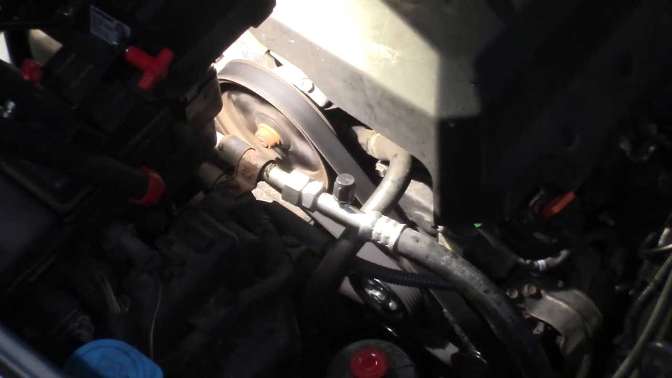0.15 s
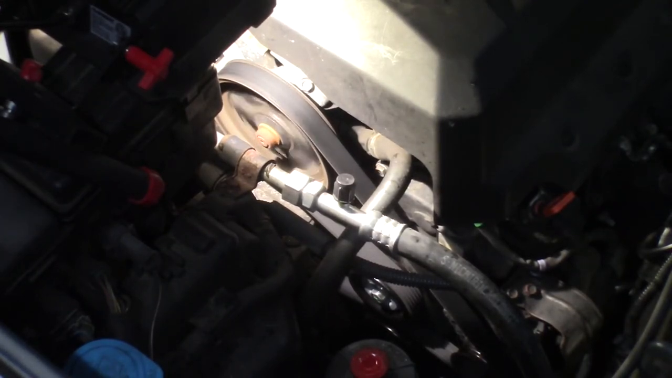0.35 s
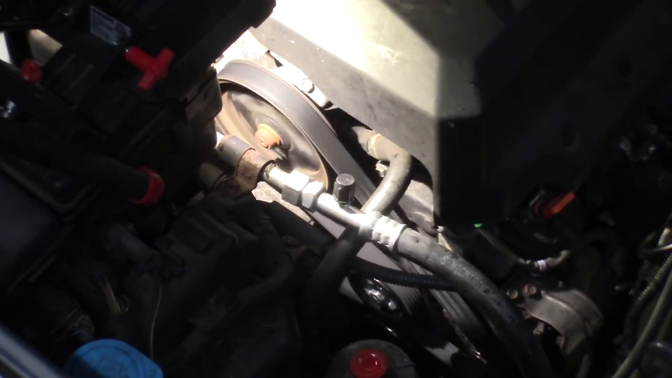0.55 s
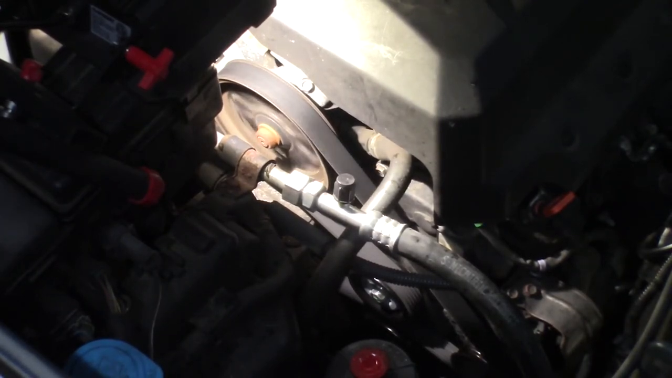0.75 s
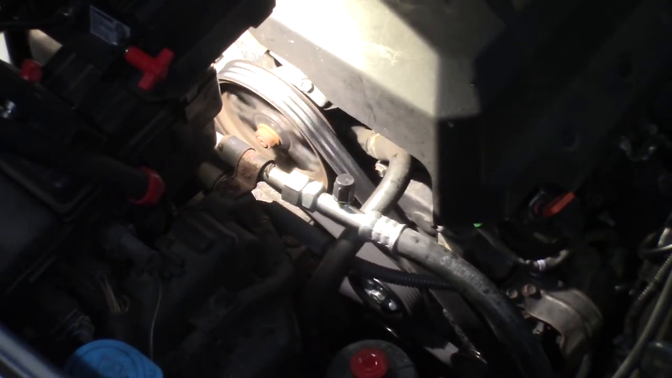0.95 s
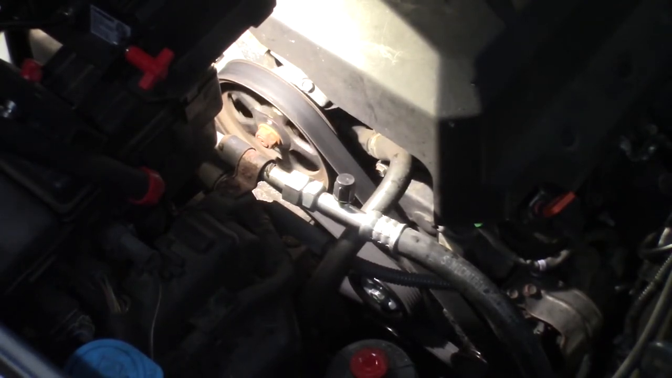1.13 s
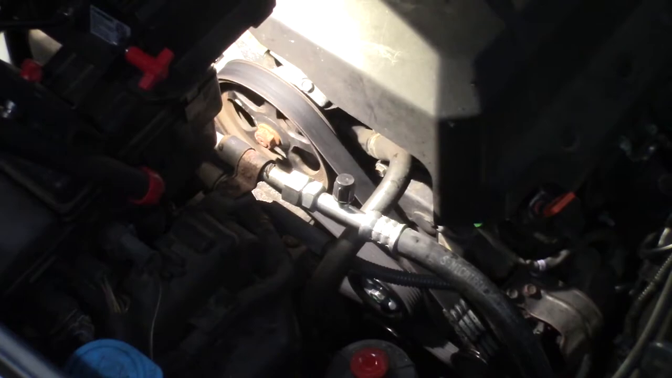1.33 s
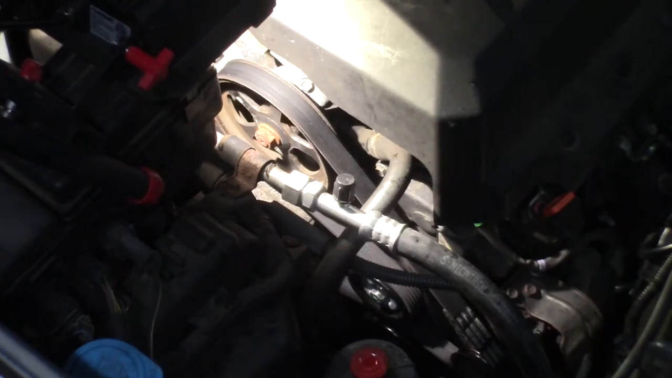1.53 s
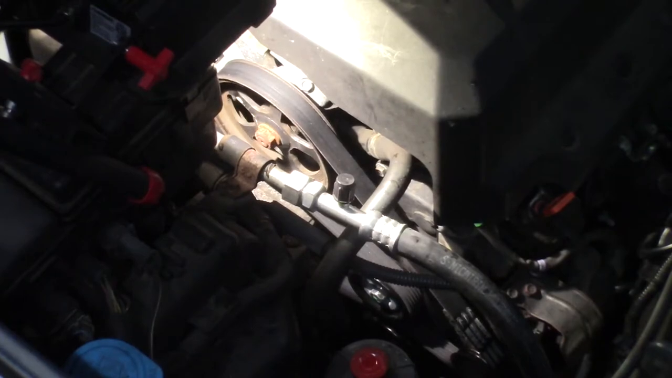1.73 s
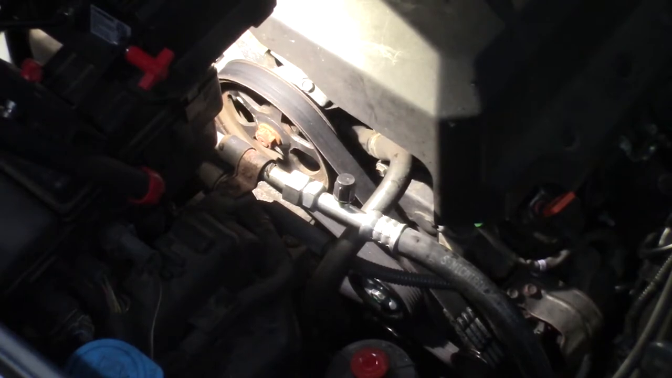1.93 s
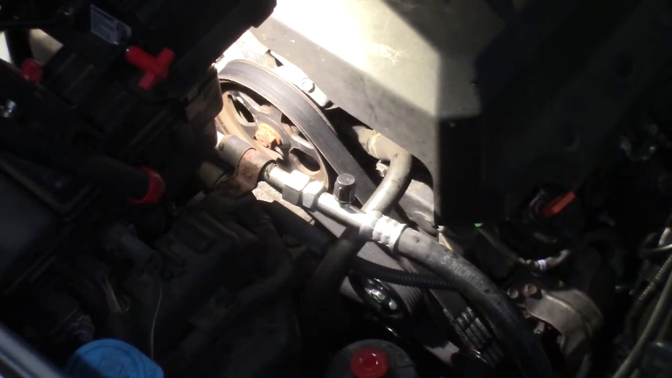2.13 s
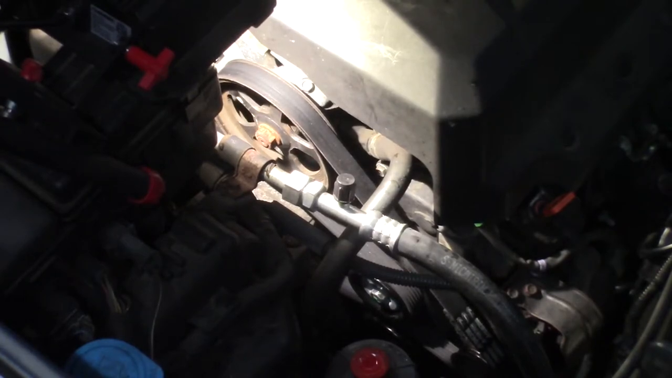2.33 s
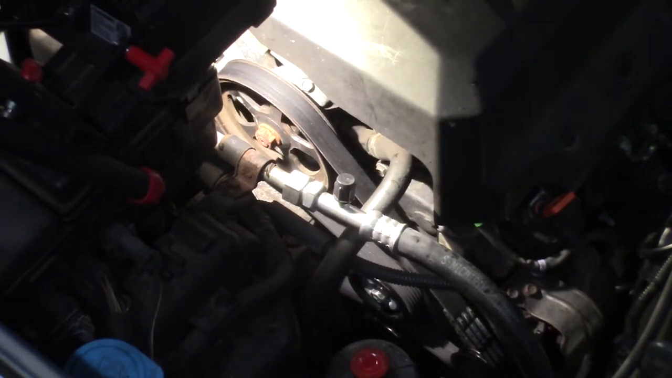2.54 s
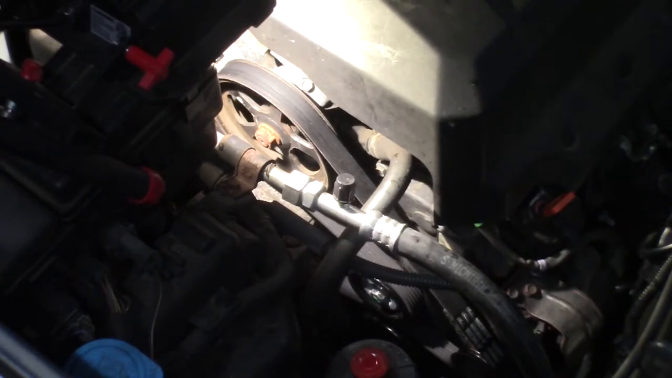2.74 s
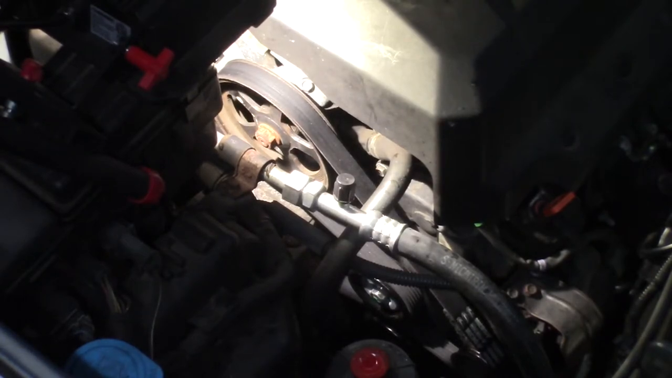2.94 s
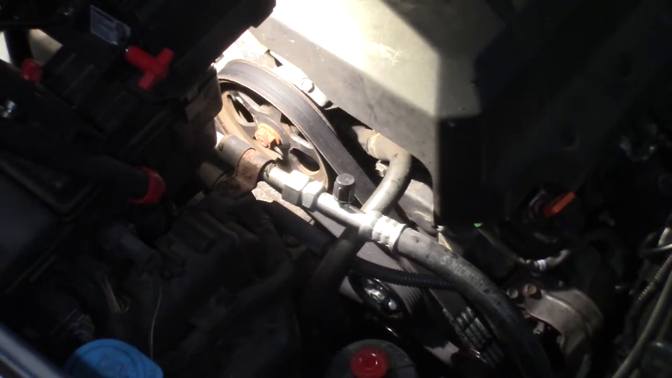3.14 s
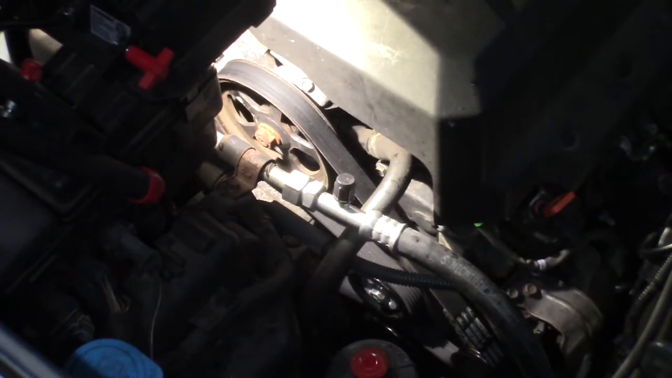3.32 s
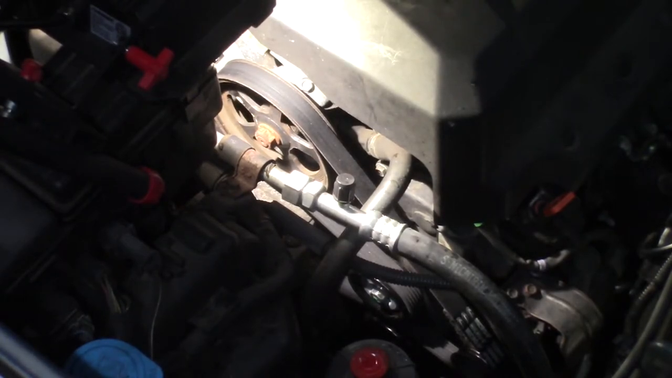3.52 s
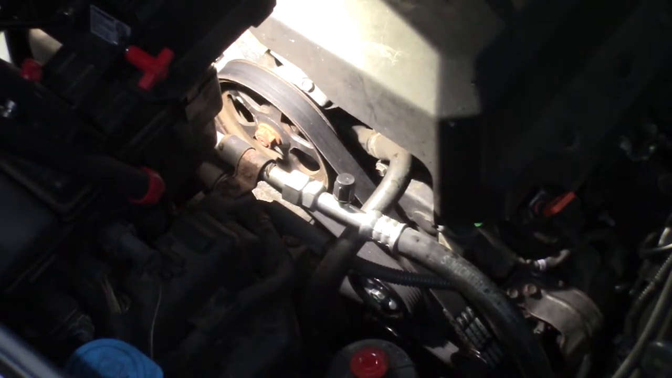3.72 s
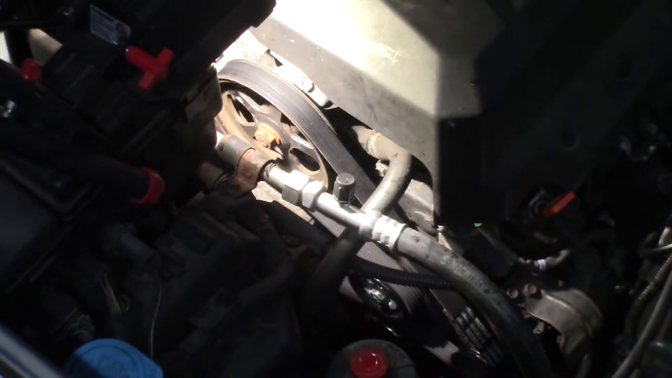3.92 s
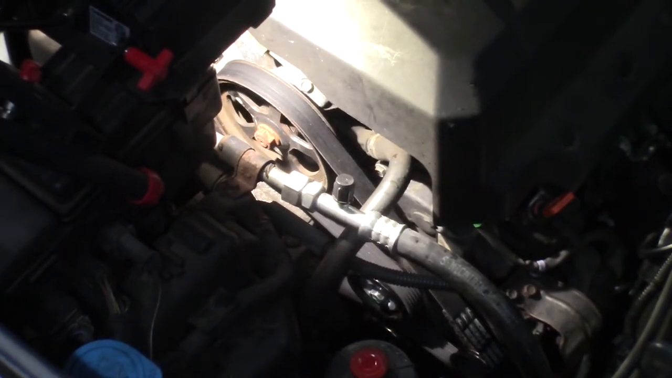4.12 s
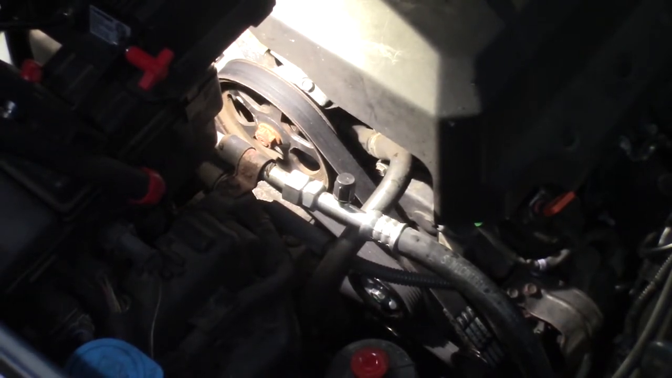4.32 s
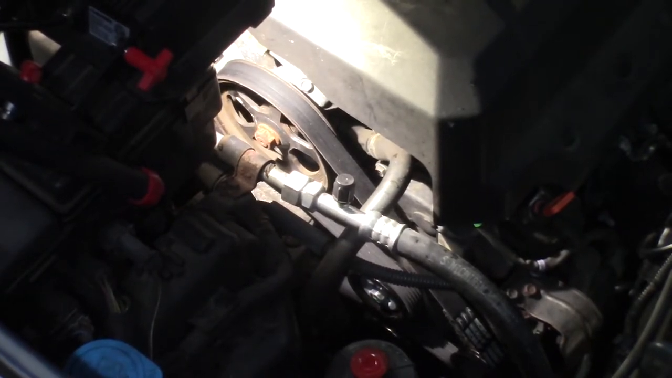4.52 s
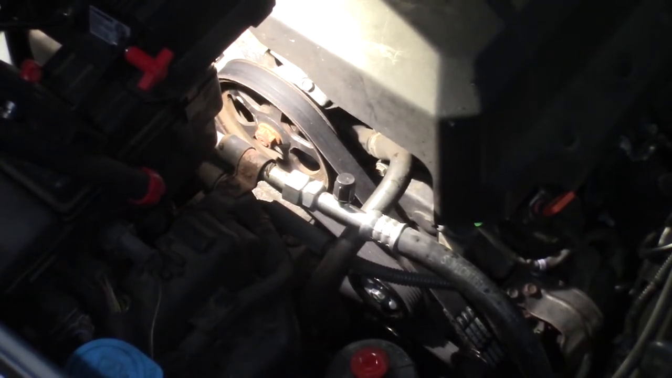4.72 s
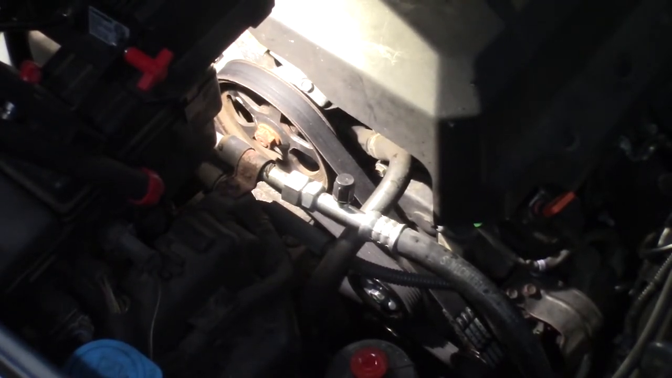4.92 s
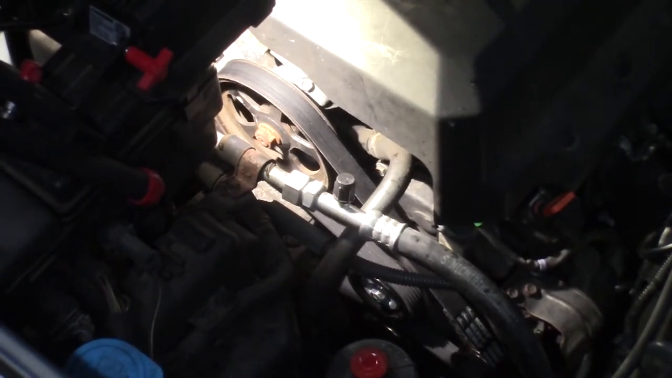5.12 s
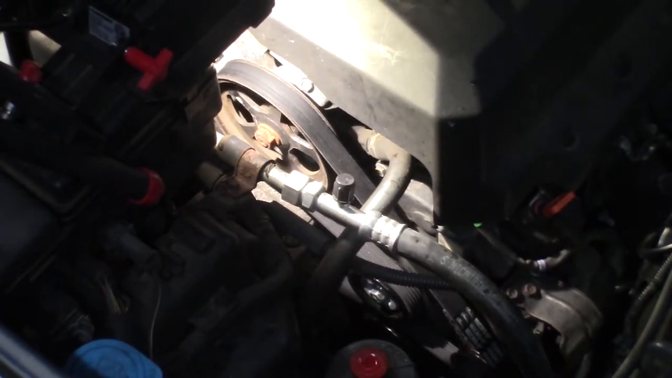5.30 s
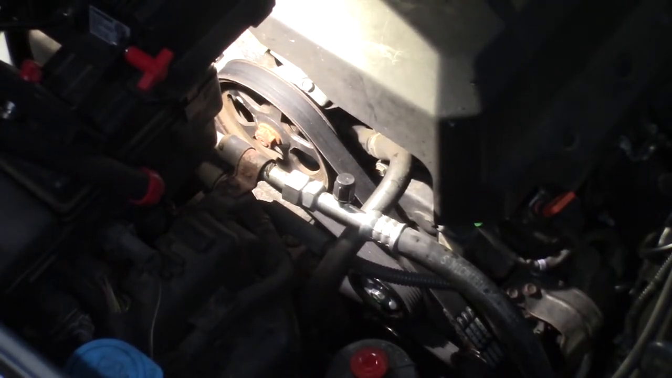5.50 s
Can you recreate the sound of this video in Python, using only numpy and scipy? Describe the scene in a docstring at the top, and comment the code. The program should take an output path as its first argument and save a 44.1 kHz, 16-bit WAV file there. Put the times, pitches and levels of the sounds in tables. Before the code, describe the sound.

Stereo microphone in an engine bay, open air: a rough, throbbing idle with hissing belt slows and dies, ending in a thud, sharp clack and brief groaning squeak. Then near silence, with a faint hum and high whine, cloth rustles and padded knocks on the body. The whine ends just before a heavy door slam with ringing panels; scuffing steps finish.

```python
"""A car engine idles under an open bonnet outdoors: firings shake the block, valves tick, the belt hisses.
Switched off, it runs down to a thud and a clack; then the belt slips with a groan.
An electric hum and a throttle actuator's whine carry on, made of steady sines.
The driver climbs out with rustles and scuffs of shaped noise and soft knocks on the car body, slams
the door, whose panels ring, and walks on to a hollow knock of a foot; walls answer clacks and knocks."""
import sys
import numpy as np
from scipy import signal
from scipy.fft import rfft, irfft, next_fast_len
from scipy.io import wavfile
from scipy.ndimage import uniform_filter1d, map_coordinates

SR = 44100
rng = np.random.default_rng(int(sys.argv[2]) if len(sys.argv) > 2 else 0)


def dump(signal):
    """Clip the signal to [-1, 1] and save it as 16-bit WAV at the path in sys.argv[1]."""
    limited = np.clip(np.atleast_2d(signal).T, -1, 1)
    pcm = np.round(limited * 32767).astype(np.int16)
    wavfile.write(sys.argv[1], SR, pcm)


N = 245195  # length in samples

# how alike left and right are, for most sounds: pitch_hz, likeness (1 = the same)
MOST_ALIKE = [(100, 0.96), (400, 0.99), (1000, .98), (2500, .94), (6000, 0.89), (10000, 1)]
# the same for belt hiss and valve ticks: pitch_hz, likeness (1 = the same)
HISS_AND_TICK_ALIKE = [(500, .995), (3000, .96), (6500, .92), (8000, .72), (11000, .55), (14000, .15)]


def amp(db):
    """Turn decibels into a gain."""
    return 10 ** (np.asarray(db) / 20)


def unit(x):
    """Scale a sound to an average strength (rms) of 1."""
    return x / np.sqrt(np.mean(x ** 2) + 1e-20)


def along(points, hz):
    """Read a curve of (pitch_hz, value) points, with pitch on a log axis."""
    f, v = np.transpose(points)
    return np.interp(np.log(hz + 1), np.log(f + 1), v)


def wobble(rate):
    """A smooth random curve through `rate` random points a second."""
    knots = rng.standard_normal(int(N * rate / SR) + 4)
    return map_coordinates(knots, [np.arange(N) * rate / SR])


def filtered(x, response):
    """Multiply the spectrum of x by a response that depends on pitch."""
    size = x.shape[-1]
    padded = next_fast_len(size + SR // 2)
    spectrum = rfft(x, padded) * response(np.fft.rfftfreq(padded, 1 / SR))
    return irfft(spectrum, padded)[..., :size]


def spread(pair, alike=MOST_ALIKE):
    """Mix two unrelated signals into left and right, as alike at each pitch as the table says."""
    def mid_side_gains(hz):
        turn = np.arccos(np.clip(along(alike, hz), -1, 1)) / 2
        return np.array([np.cos(turn), np.sin(turn)])
    mid, side = filtered(pair, mid_side_gains)
    return np.array([mid + side, mid - side])


def noise(spectrum, size=N, alike=MOST_ALIKE):
    """Stereo noise of rms 1, coloured by (pitch_hz, level_db) points."""
    white = spread(rng.standard_normal((2, size)), alike)
    return unit(filtered(white, lambda hz: amp(along(spectrum, hz))))


def patchy(x, depth_db):
    """Let the colour of x drift in patches of pitch and time; the result has rms 1."""
    z = signal.stft(x, nperseg=512)[2]
    field = rng.standard_normal(z.shape[1:])
    field = uniform_filter1d(uniform_filter1d(field, 5, 0), 16, 1)
    return unit(signal.istft(z * amp(depth_db * unit(field)), nperseg=512)[1][:, :N])


def resonate(x, modes):
    """Send x through (pitch_hz, width_hz, level_db) resonances, side by side with alternating sign."""
    def response(f):
        return sum((-1) ** k * amp(db) * 1j * f * width / (hz * hz - f * f + 1j * f * width)
                   for k, (hz, width, db) in enumerate(modes))
    return filtered(x, response)


def dying(x, decays):
    """Let each pitch of x die away at its own speed, from (pitch_hz, time to fall 60 dB in s) points."""
    hz, t, z = signal.stft(x, SR, nperseg=256)
    fade = amp(-60 * t / along(decays, hz)[:, None])
    return signal.istft(z * fade, SR, nperseg=256)[1][:, :x.shape[1]]


def ring(modes):
    """One second of fading (pitch_hz, level_db, t60_s) sines, each slightly random in strength; peak 1."""
    t = np.arange(SR) / SR
    y = sum(amp(db + rng.normal(0, 1.6) - 60 * t / t60) * np.sin(2 * np.pi * (hz * t + rng.random()))
            for hz, db, t60 in modes)
    return y / np.abs(y).max()


def tone(hz, waver):
    """A sine of rms 1 whose pitch wavers by a small share of itself."""
    pitch_hz = hz * (1 + waver * wobble(38.93))
    return np.sin(2 * np.pi * np.cumsum(pitch_hz) / SR) * np.sqrt(2)


def add(track, s, sound):
    """Mix a sound into a track at a time in seconds."""
    part = track[:, round(s * SR):][:, :sound.shape[-1]]
    part += sound[..., :part.shape[1]]


def engine():
    """Firings shake the block's resonances, valves tick and the belt hisses; with the key off all slow and fade."""
    # broad sound of the block: pitch_hz, level_db (per Hz)
    block_colour = [(18, -67), (30, -48), (113, -8.5), (151, -9.5), (340, 1), (397, -18), (437, -6),
                    (472, -6), (749, -1.5), (891, -7.5), (1360, -7), (2160, -21), (3000, -19.5),
                    (3900, -26), (6600, -120)]
    # ringing block and covers: pitch_hz, level_db
    block_modes = [(129.2, -66), (231.5, -30), (306.8, -70), (349.9, -25.5), (436.0, -33.5), (516.8, -27.5),
                   (619.1, -29.5), (759.0, -25), (834.4, -32.5), (947.5, -62), (1130, -44), (1319, -48),
                   (1410, -36), (1464, -59), (1534, -40)]
    # belt hiss: pitch_hz, level_db (per Hz)
    hiss_colour = [(1060, -21), (1800, 0), (2160, -4.5), (2490, -2), (2930, -8), (3350, -2.5), (3700, -9),
                   (5070, 0), (7080, -9), (7820, -11.5), (9360, -11.5), (10400, -10), (12400, -19),
                   (15500, -26.5)]
    # valve gear: pitch_hz, level_db (per Hz)
    tick_colour = [(2000, -19), (4300, -1), (5400, 6), (6500, -7), (8500, -10), (10700, 2), (12500, -15),
                   (15500, -14)]
    idle_rate, first_firing_s = 25.3, .025  # firings per second at idle; start of the count
    key_off_s, coast_s = .47, .48  # ignition off; time in which the speed falls to about a third (1/e)

    coasting = np.maximum(np.arange(N) / SR - key_off_s, 0)
    speed = np.exp(-coasting / coast_s)
    firings = idle_rate * (np.cumsum(speed) / SR - first_firing_s)
    # gain at idle, loss in dB after 1 s of coasting, bend of that fall
    block_gain = amp(-18.5 - 35 * coasting ** 1.83)
    hiss_gain = amp(-27.5 - 39.5 * coasting ** 1.21)

    # each compression swells; while coasting, one cylinder bank pumps harder than the other
    compression_db = 0.9 * np.cos(2 * np.pi * firings)
    bank_db = (1 - speed) * np.cos(np.pi * firings)
    throb = amp(compression_db - bank_db)
    shaking = spread(rng.standard_normal((2, N))) * throb + cylinders(firings)
    casing = filtered(shaking, lambda hz: amp(along(block_colour, hz)))
    ringing = throb * resonate(shaking, [(hz, 11, db) for hz, db in block_modes])  # each 11 Hz wide
    # both are levelled by their first second
    body = amp(-2.5) * casing / casing[:, :SR].std() + amp(-4.5) * ringing / ringing[:, :SR].std()

    # one tick per firing, fading over 0.13 of a firing, with scattered strength
    tick_gain = np.exp(-((firings + .55) % 1) / .13) * amp(4 + 1.7 * wobble(23.5))
    valves = tick_gain * noise(tick_colour, alike=HISS_AND_TICK_ALIKE)
    steady_hiss = patchy(noise(hiss_colour, alike=HISS_AND_TICK_ALIKE), depth_db=2.5)
    belt_hiss = amp(1.5 + 0.25 * wobble(148.6)) * steady_hiss
    return block_gain * body + hiss_gain * (belt_hiss + valves)


def cylinders(firings, count=6):
    """Each cylinder has its own short clatter of noise, repeated every turn at a varying strength."""
    t = np.arange(SR // 8) / SR
    clatter = rng.standard_normal((count, len(t))) * t * amp(-60 * t / .08)
    out = np.zeros((1, N))
    firing_samples = np.flatnonzero(np.diff(np.floor(firings + .2)))
    for k, at in enumerate(firing_samples):
        add(out, at / SR, clatter[k % count] * amp(rng.normal(0, 1)))
    return out / out[:, :SR].std()


def mounts():
    """The engine stops with a thud; its rubber mounts give way, then stiffen, so the note starts low."""
    stop_s, level_db, pitch_hz, t60_s = 0.98, -13, 203.6, 0.22  # t60: time to fall by 60 dB
    out, t = np.zeros((2, N)), np.arange(SR) / SR
    note = np.sin(2 * np.pi * (pitch_hz * t - .5 * (1 - np.exp(-t / .015))))
    add(out, stop_s, amp(level_db - 60 * t / t60_s) * note * (1 - np.exp(-t / 0.015)))
    return out


def belt():
    """The belt sticks and slips on a pulley: each slip groans, squeaks and hisses, and the pulley rings on."""
    # slips: start_s, groan_db, hiss_db
    slip_times = [(1.099, -43, -32.5), (1.13, -30, -34), (1.18, -30.5, -45)]
    # hiss of the slipping belt: pitch_hz, level_db (per Hz)
    slip_hiss_colour = [(1500, 0), (3000, -4), (5000, -0.5), (7000, -1.5), (9000, -7), (11000, -4.5),
                        (13000, -16), (15500, -12)]
    rise_s, release_t60_s = 0.048, 0.16  # swell and release of a slip
    pulley_db, pulley_t60_s = -8.5, 0.57  # the pulley's slower fade

    t, power = np.arange(N) / SR, np.zeros((2, N))
    for s, *levels in slip_times:
        after = np.maximum(t - s, 0)
        slip_fade = amp(-60 * after / release_t60_s)
        pulley_fade = amp(pulley_db - 60 * after / pulley_t60_s)
        swell = np.exp(np.minimum(t - s, 0) / rise_s)
        power += (amp(levels)[:, None] * swell * np.maximum(slip_fade, pulley_fade)) ** 2
    groan_gain, hiss_gain = np.sqrt(power)

    groan = tone(609, waver=0.0178) + amp(-10.5) * tone(200, waver=0.037) + amp(-14.5) * tone(390, waver=0.0258)
    squeak = amp(-18) * tone(4200, waver=.005)  # the pulley's rim sings along
    hiss = hiss_gain * noise(slip_hiss_colour, alike=HISS_AND_TICK_ALIKE)
    return amp(3 * wobble(120)) * groan_gain * (groan + squeak) + hiss


def door():
    """Quick contacts punch the door and set its panels ringing, with a longer tail of noise outdoors."""
    # the door meets seal, latch and frame: start_s, level_db
    contacts = [(4.072, -16), (4.083, -8.5), (4.107, -10.5), (4.143, -12), (4.182, -27.5)]
    # colour of the blow: pitch_hz, level_db (per Hz)
    door_colour = [(15, -59), (25, -42), (50, -20), (104, -15.5), (204, -7), (359, -4.5), (389, -5.5),
                   (520, -6), (666, -8.5), (741, -13.5), (970, -12.5), (1300, -20.5), (4750, -32),
                   (8810, -46), (15500, -62)]
    # how fast the tail dies: pitch_hz, t60_s (time to fall by 60 dB)
    door_decay = [(60, 0.81), (200, 0.67), (600, 0.59), (2000, 0.68), (4500, 0.58), (12000, 0.59)]
    # the door's panel modes: pitch_hz, level_db, t60_s
    panel_modes = [(72, -4, .95), (117, -6, .4), (198, 0, .4), (232, -3, .4), (288, 0, .45), (353, -1, .5),
                   (398, 1, .5), (495, -1, .5), (663, -4, .55), (867, -6, .5)]

    out, t = np.zeros((2, N)), np.arange(SR) / SR
    for s, db in contacts:
        rattle_db = 2 * wobble(150)[:SR]  # loose parts make each blow uneven
        blow = noise(door_colour, size=SR) * amp(-3 - 60 * t / .14 + rattle_db)
        tail = amp(-2.5) * dying(noise(door_colour, size=SR), door_decay)
        panels = amp(-3) * ring(panel_modes)
        add(out, s, amp(db) * (blow + tail + panels) * (1 - np.exp(-t / .003)))
    return out


def driver():
    """Cloth and soles catch, swell and fade: a coarse scrape and a fine swish over a dull shuffle."""
    # strokes: start_s, swell_s, scrape_db (2 dB is added below), swish_db
    strokes = [(1.741, 0.092, -41.5, -46.5), (1.916, 0.068, -44, -50.5), (2.176, 0.03, -57, -49.5),
               (2.244, 0.072, -41, -46.5), (2.525, 0.25, -54.5, -59), (2.881, 0.15, -44.5, -45.5),
               (2.978, 0.14, -53.5, -52), (3.415, 0.048, -51, -50), (3.59, 0.061, -38.5, -44.5),
               (4.507, 0.043, -47, -49), (4.632, 0.082, -44.5, -49), (4.903, 0.13, -49.5, -55.5),
               (5.055, .077, -37, -34)]
    # coarse scrape: pitch_hz, level_db (per Hz)
    scrape_colour = [(410, -37), (700, -7.5), (1620, -3.5), (1930, -0.5), (2070, -1.5), (3130, -0.5),
                     (4070, -4.5), (5000, -2.5), (6500, -7.5), (11000, -120)]
    # fine swish: pitch_hz, level_db (per Hz)
    swish_colour = [(2500, -30), (4500, -2.5), (6000, -2.5), (8000, -2.5), (10400, -6), (13000, -15),
                    (15500, -23)]
    # dull shuffle: pitch_hz, level_db (per Hz)
    shuffle_colour = [(47, -47), (80, -32), (114, -13), (216, -8), (419, -4), (456, -5), (529, -3.5),
                      (719, -4), (1500, -10.5), (1950, -18.5), (3300, -120)]
    catch_s, swell_db, fade_db_per_s = .025, 8, 108  # catch, rise to the crest, fade after it
    shuffle_db, shuffle_growth = -41.5, 0.37  # shuffle of the hardest stroke; its dB per dB of scrape

    t, power = np.arange(N) / SR, np.zeros((3, N))
    hardest_db = max(row[2] for row in strokes)
    for start, swell, scrape_db, swish_db in strokes:
        past_crest = t - start - swell
        shape_db = np.minimum(swell_db * past_crest / swell, -fade_db_per_s * past_crest)
        stroke = np.clip((t - start) / catch_s, 0, 1) * amp(shape_db)
        body_db = shuffle_db + shuffle_growth * (scrape_db - hardest_db)
        power += (amp([scrape_db, swish_db, body_db])[:, None] * stroke) ** 2
    scrape_gain, swish_gain, body_gain = np.sqrt(power)

    grains = unit(amp(0.68 * wobble(900) + 0.54 * wobble(65)))  # fine and slow roughness
    scrape = amp(2) * scrape_gain * patchy(noise(scrape_colour), depth_db=1.6)
    swish = swish_gain * noise(swish_colour)
    shuffle = body_gain * patchy(noise(shuffle_colour), depth_db=2.5)
    return grains * (scrape + swish) + shuffle


def hard_knocks():
    """Metal clacks, and last a hollow knock of a foot: a crack, a brief ring, a note and a hollow rattle."""
    # hard knocks: start_s, level_db, ring_db, rattle_db (8 dB is taken off below), pitch_hz
    hits = [(.277, -11.5, -17, -14, 6460), (.988, -11, -11.5, 1, 4670), (1.232, -30.5, -18, -9, 6700),
            (3.803, -20, -20.5, -9.5, 4530), (5.277, -30.5, -19, 8, 1010)]
    # resonances of the brief ring: pitch_hz, width_hz, level_db
    ring_modes = [(2520, 210, -1), (3380, 470, -10), (4180, 160, -1), (4820, 140, -3), (6010, 89, -2.5),
                  (6900, 220, -13), (8700, 370, -13)]
    crack_colour = [(500, -5.5), (2500, -4), (4700, 3.5), (7000, -12.5), (15000, -25)]  # pitch_hz, level_db
    rattle_colour = [(300, -27), (700, 2.5), (1100, -5), (1600, -11.0), (2200, -10.0), (4500, -9), (9000, -40)]

    out, t = np.zeros((2, N)), np.arange(SR) / SR
    for s, db, ring_db, rattle_db, hz in hits:
        crack = noise(crack_colour, size=SR) * amp(-3.5 - 60 * t / 0.039)
        brief_ring = unit(resonate(spread(rng.standard_normal((2, SR))), ring_modes))
        brief_ring = brief_ring * amp(ring_db - 60 * t / 0.24)
        note = amp(-5) * ring([(hz, 0, .04), (hz * .91, -5, .05)])
        rattle = noise(rattle_colour, size=SR) * amp(rattle_db - 8.0 - 60 * t / 0.088)
        add(out, s, amp(db) * (crack + brief_ring + note + rattle) * (1 - np.exp(-t / 0.0018)))
    return out + amp(-8) * walls(out)


def soft_knocks():
    """Padded contacts with the car's panels: a dull bump of noise and a short panel note."""
    # knocks: start_s, level_db, pitch_hz
    touches = [(1.755, -30.5, 193), (1.86, -29.5, 408), (1.968, -28.5, 531), (1.999, -33.5, 570),
               (2.724, -47, 850), (3.984, -34, 760), (4.008, -27, 529), (4.966, -30.5, 318)]
    bump_colour = [(60, -25), (200, -3), (650, 0), (1500, -17), (6000, -38), (12000, -60)]  # pitch_hz, level_db

    bumps, panels, t = np.zeros((2, N)), np.zeros((2, N)), np.arange(SR) / SR
    for s, db, hz in touches:
        onset = amp(db) * (1 - np.exp(-t / .002))
        add(bumps, s, onset * noise(bump_colour, size=SR) * amp(-11 - 60 * t / .12))
        add(panels, s, onset * ring([(hz, 0, .16), (hz * .85, -7, .09), (hz * 1.2, -7, .09)]))
    return amp(-0.5) * panels + bumps + amp(1.5) * walls(bumps)


def electrics():
    """The chopped current of the throttle actuator sings over a low hum."""
    # partials of the whine: multiple of its pitch, level_db
    whine_partials = [(1, 2), (2, -8), (3, -28)]
    whine_hz, whine_on_s, whine_off_s = 4999.3, 1.17, 3.8
    hum_on_s, hum_drop_s, hum_off_s = 0.98, 2.26, 5.2  # the hum starts, steps down and ends

    t = np.arange(N) / SR
    phase = 2 * np.pi * whine_hz * t + .1 * wobble(31.4)
    whine = sum(amp(db) * np.sin(round(k) * phase) for k, db in whine_partials)
    hum = tone(91.5, waver=0.011) + amp(-2.5) * tone(1276, waver=0.00074)
    # the whine sags by 1.1 dB a second
    whine_gain = amp(-55.5 - 1.1 * (t - whine_on_s)) * held(whine_on_s, whine_off_s)
    hum_gain = amp(-63.5) * held(hum_on_s, hum_drop_s) + amp(-72) * held(hum_drop_s, hum_off_s)
    return whine_gain * whine + hum_gain * hum


def held(on_s, off_s):
    """A gain that ramps up around one time, holds, and ramps down around another."""
    t, ramp_s = np.arange(N) / SR, 0.11
    return np.clip(np.minimum(t - on_s, off_s - t) / ramp_s + .5, 0, 1)


def walls(x):
    """The surroundings answer with many blurred reflections: x is smeared by a fading burst of noise."""
    # how fast the reflections die: pitch_hz, t60_s (time to fall by 60 dB)
    wall_decay = [(150, 0.27), (1000, 0.78), (5000, 0.35), (12000, 0.077)]
    tail = dying(spread(rng.standard_normal((2, SR // 2))), wall_decay)
    return signal.fftconvolve(x, tail / np.linalg.norm(tail[0]), axes=1)[:, :N]


def outdoor_air():
    """The outdoor background is a faint, steady coloured noise."""
    # colour of the air: pitch_hz, level_db (per Hz)
    air_colour = [(15, -43), (25, -12), (297, 5), (1850, -6.5), (2120, -6), (4150, -13.5), (4870, -12),
                  (5280, -13.5), (9550, -20.5), (10400, -23), (11200, -26), (15500, -29)]
    return amp(-53.5) * noise(air_colour)


def scene():
    """All sources over the outdoor air."""
    car = engine() + mounts() + belt() + electrics()
    return car + hard_knocks() + soft_knocks() + door() + driver() + outdoor_air()


def record(dry):
    """Peaks are rounded just below full scale and the band is limited at both ends."""
    rounded = dry / (1 + np.abs(dry / .95) ** 6) ** (1 / 6)
    top_hz, bass_hz = 15800, 36  # sharp cut above, gentle slope below
    return filtered(rounded, lambda hz: (hz < top_hz) * hz ** 3 / np.hypot(hz ** 3, bass_hz ** 3))


dry = scene()
out = record(dry)
dump(out)
```